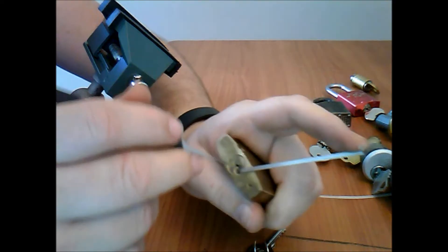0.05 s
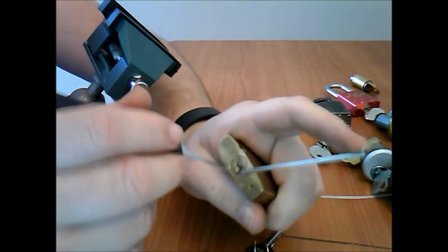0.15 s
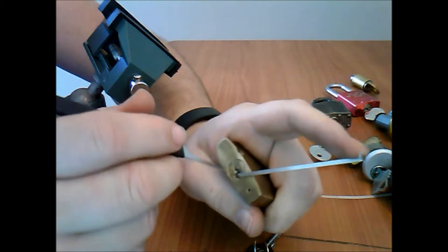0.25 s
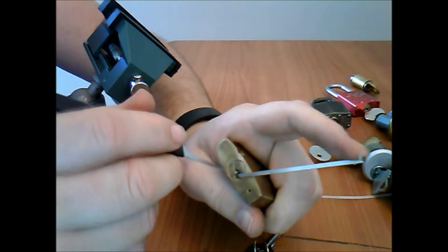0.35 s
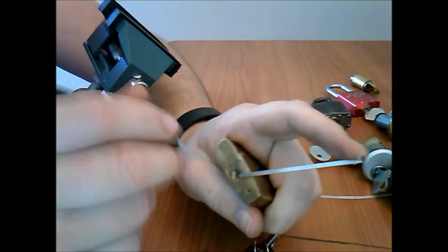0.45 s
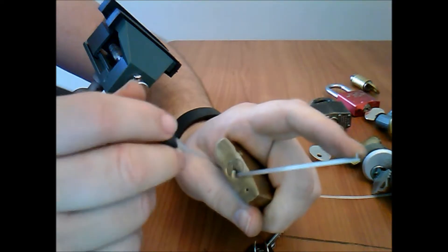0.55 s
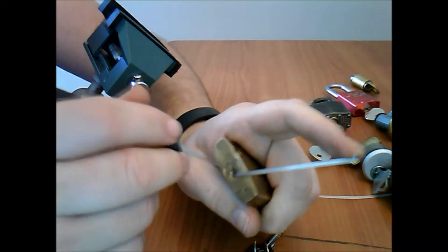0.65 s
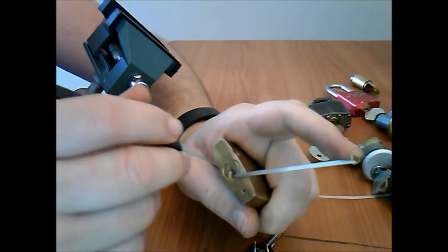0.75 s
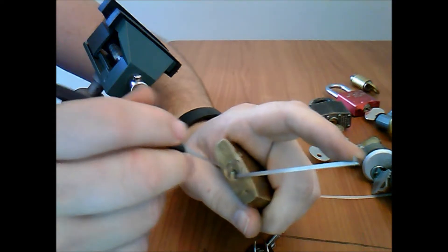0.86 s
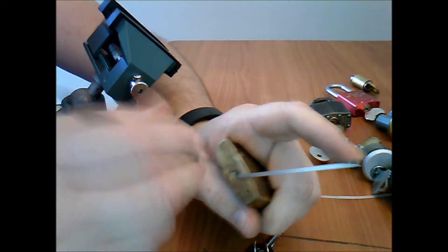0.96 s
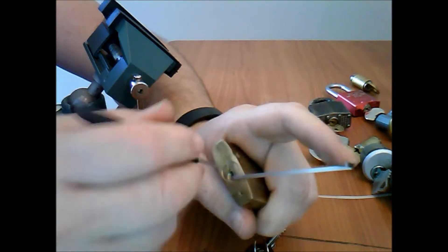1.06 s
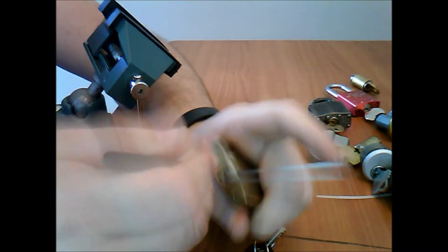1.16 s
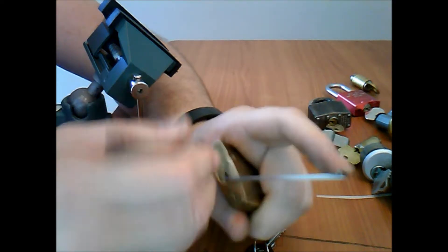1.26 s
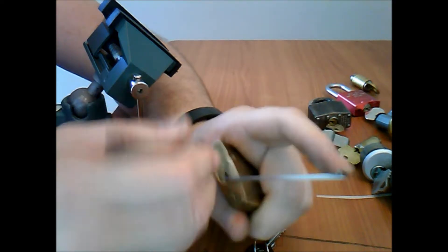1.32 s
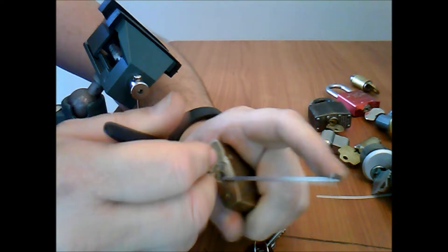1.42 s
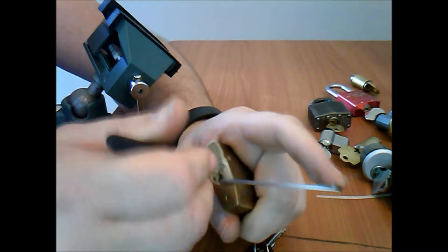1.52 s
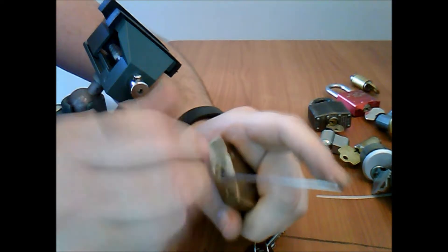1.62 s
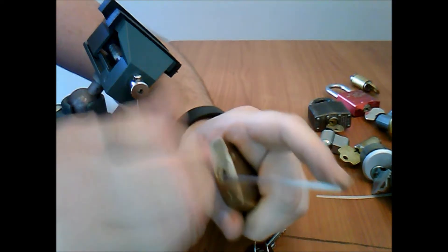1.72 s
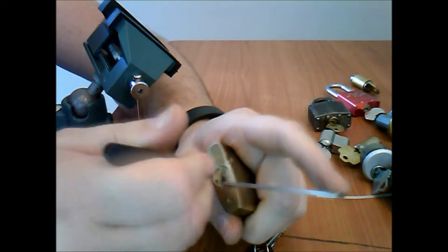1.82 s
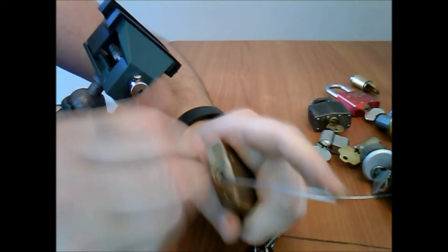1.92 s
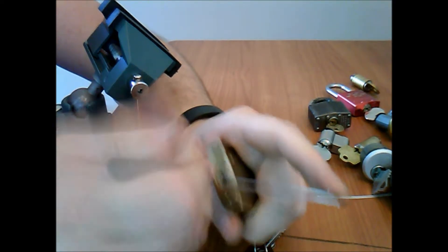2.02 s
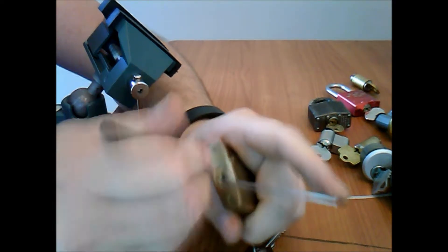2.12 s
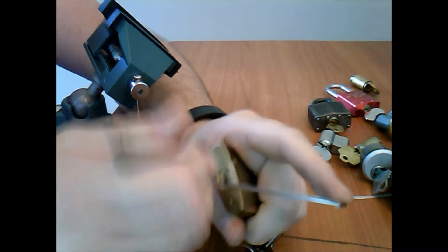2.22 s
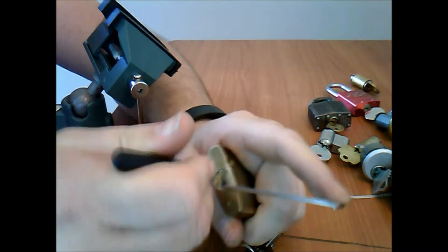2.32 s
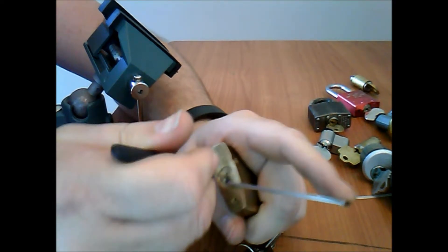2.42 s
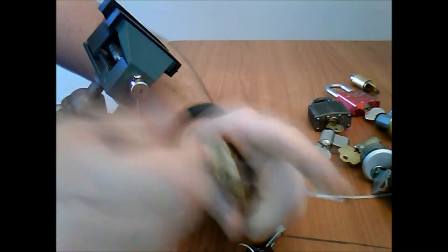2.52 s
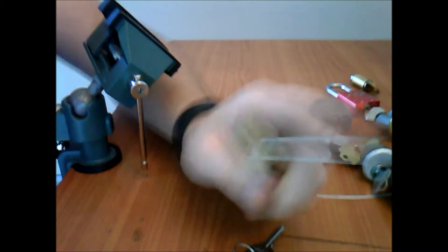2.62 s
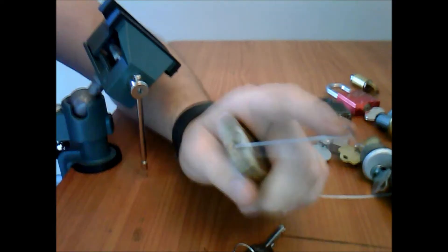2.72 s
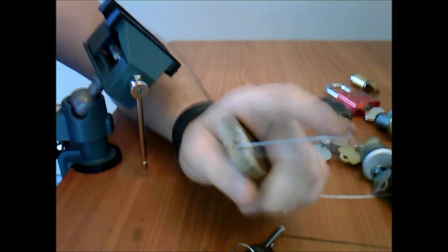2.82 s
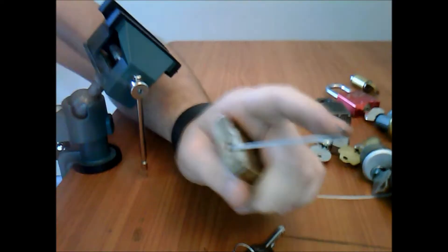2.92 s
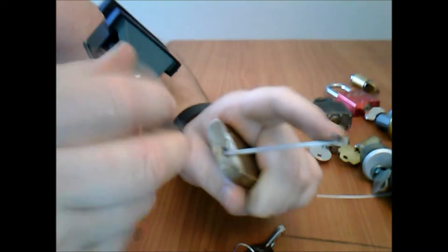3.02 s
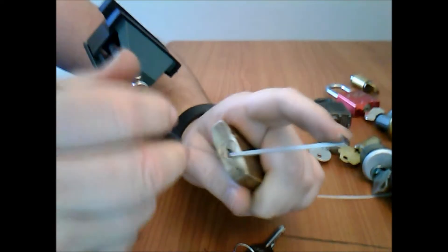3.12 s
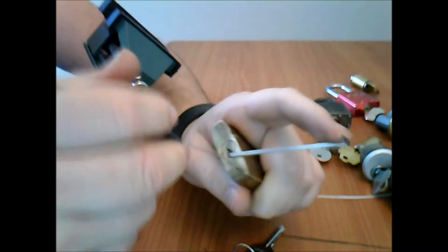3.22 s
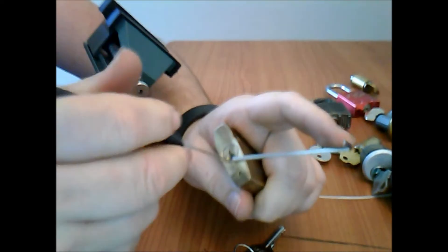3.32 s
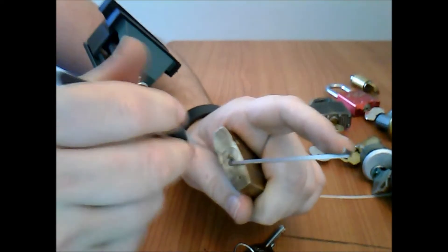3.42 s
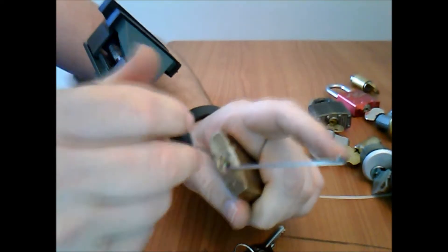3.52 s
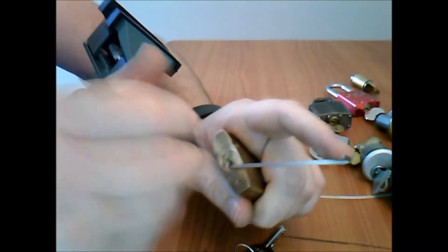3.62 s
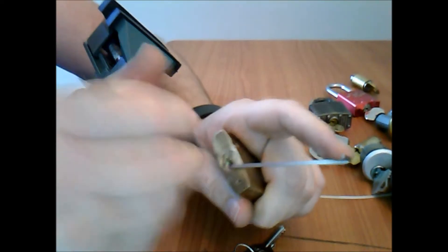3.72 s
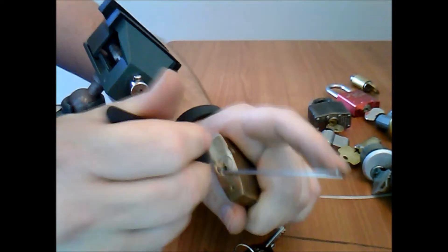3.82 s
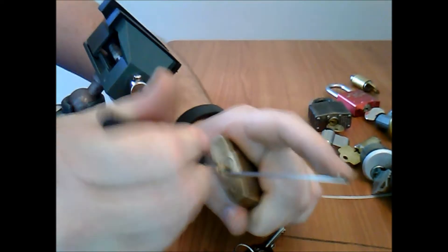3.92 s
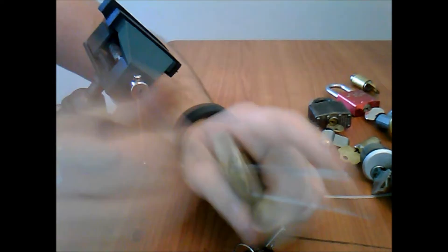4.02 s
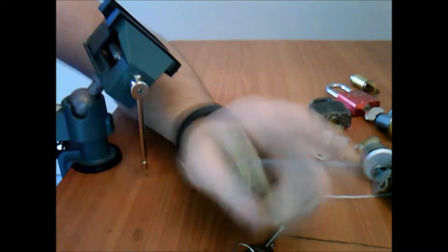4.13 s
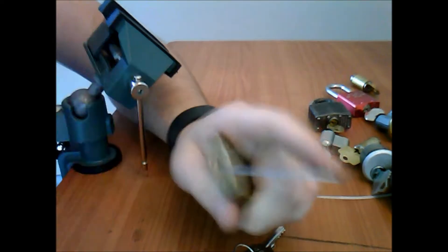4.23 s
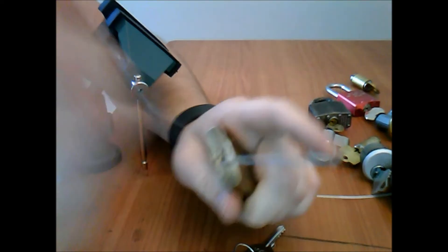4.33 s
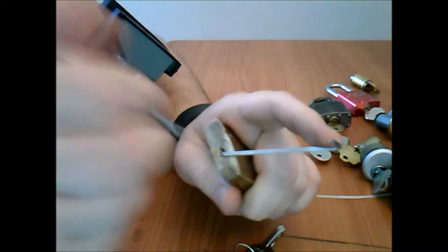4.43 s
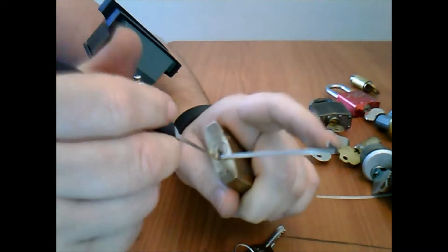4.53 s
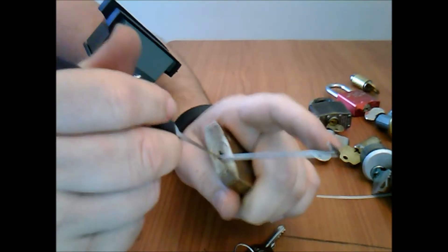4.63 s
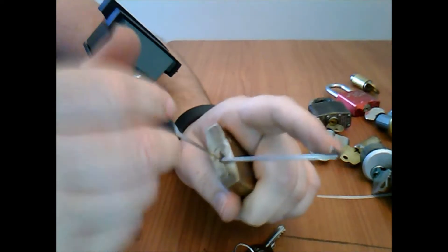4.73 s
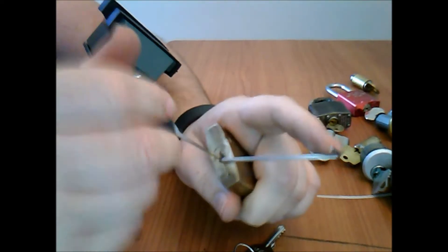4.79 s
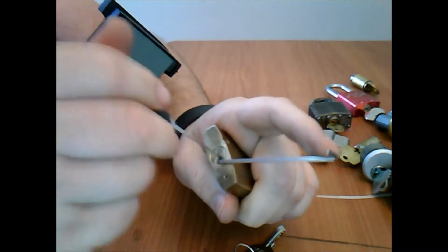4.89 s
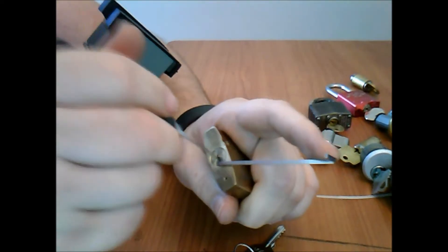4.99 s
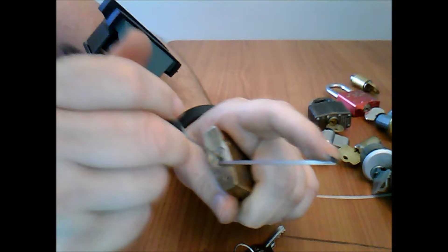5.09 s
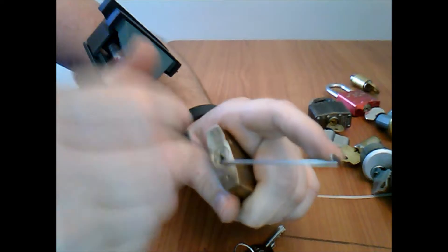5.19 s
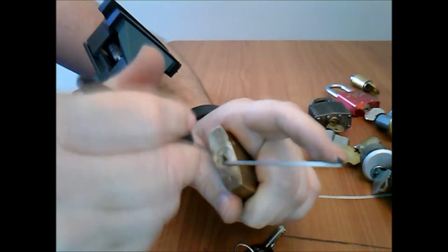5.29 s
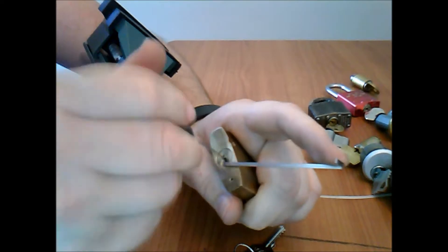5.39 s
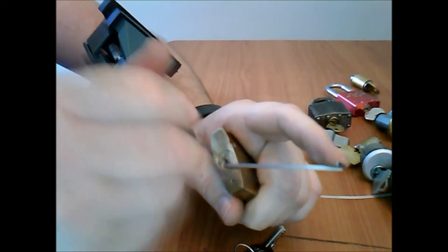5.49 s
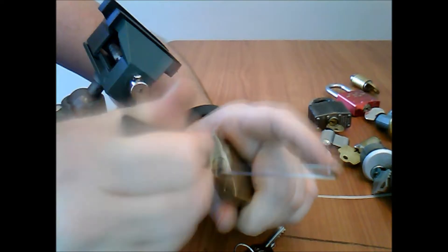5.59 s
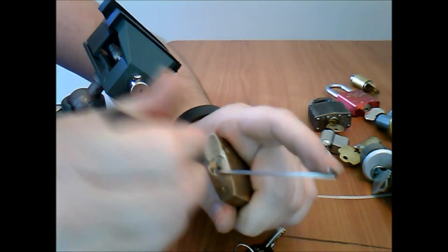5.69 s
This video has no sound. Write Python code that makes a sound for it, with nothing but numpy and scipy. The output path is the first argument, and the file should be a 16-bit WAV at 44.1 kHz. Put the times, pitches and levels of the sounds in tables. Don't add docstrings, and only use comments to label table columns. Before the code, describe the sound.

A steel pick clicks quietly in a brass padlock, then rips out twice with sharp metallic zips, amid desk thumps and faint electronic whine.

```python
import sys
import numpy as np
from scipy import signal
from scipy.io import wavfile
from scipy.ndimage import uniform_filter1d

SR = 44100
rng = np.random.default_rng(int(sys.argv[2]) if len(sys.argv) > 2 else 0)


def natural_amplitude(level_db):
    exponent = np.asarray(level_db, float) / 20
    return 10 ** exponent


def log_audio(samples):
    frames = np.atleast_2d(samples).T
    limited = np.clip(frames, -1, 1)
    pcm = np.round(limited * 32767).astype(np.int16)
    wavfile.write(sys.argv[1], SR, pcm)


N = 253575


def unit_rms(x):
    return x / np.sqrt(np.mean(x ** 2) + 1e-20)


def read_curve(points, hz):
    f, value = np.transpose(points)
    return np.interp(np.log(hz + 1), np.log(f + 1), value)


def add(mix, s, sound):
    part = mix[round(s * SR):][:len(sound)]
    part += sound[:len(part)]


def resonate(x, hz, width):
    return signal.lfilter(*signal.iirpeak(hz, hz / width, SR), x)


def resonate_twice(x, hz, width, second=1):
    return resonate(resonate(x, hz, width), hz, second * width)


def body(x, modes):
    return unit_rms(sum(natural_amplitude(db) * resonate_twice(x, hz, w, 1.4) for hz, w, db in modes))


def swells(rows, rest_db):
    t = np.arange(N) / SR
    fall_db = -15.5
    level = natural_amplitude(rest_db)
    for s, db, length in rows:
        level = level + natural_amplitude(db + fall_db * abs(t - s) / max(length, .01))
    return level


# frequency in Hz, density in dB per Hz.
HISS = [(15, -24), (25, 10.5), (50, -7), (180, -26), (354, -19.5), (516, -19.5), (714, -14), (1260, -16.5),
        (1520, -22.5), (2000, -21.5), (4250, -30), (4740, -29), (5730, -33.5), (8140, -29.5),
        (16000, -60.5)]
# frequency in Hz, width in Hz, level in dB.
FAN = [(122.84, 6.18, -69), (3356, 850, -81.5)]


def air():
    hiss_db, patch_db = -67.5, 1.8
    frames, hz = N // 256 + 5, np.fft.rfftfreq(1024, 1 / SR)
    a, b, patches = rng.standard_normal((frames, 513, 3)).T
    patches = unit_rms(uniform_filter1d(uniform_filter1d(patches, 14, 0), 14, 1))
    spectra = (a + 1j * b) * natural_amplitude(read_curve(HISS, hz)[:, None] + patch_db * patches)
    hiss = signal.istft(spectra, nperseg=1024, noverlap=768)[1][:N]
    hums = sum(natural_amplitude(db) * unit_rms(resonate_twice(rng.standard_normal(N), f, w)) for f, w, db in FAN)
    return natural_amplitude(hiss_db) * unit_rms(hiss) + hums


# time in seconds, level in dB.
DRONE = [(0.0, -72), (1.55, -72), (1.92, -67), (2.21, -67), (2.451, -72.5), (2.751, -70), (2.99, -65.5),
         (3.621, -77.5), (3.84, -76.5), (4.02, -62), (4.32, -65), (4.64, -73), (4.851, -70.5), (5.28, -61),
         (5.57, -74), (5.75, -71)]


def drone():
    fuzz = resonate_twice(rng.standard_normal(N), 588, 130)
    return natural_amplitude(np.interp(np.arange(N) / SR, *np.transpose(DRONE))) * unit_rms(fuzz)


# frequency in Hz, level in dB, fuzz from 0 to 1.
WHINE = [(4000, -11, .6), (6000, -3, .55), (8000, 3.5, .4), (10000, -.5, .35), (12000, -10, .55),
         (14000, -17, .3)]
# start in seconds, length in seconds, level in dB.
BURSTS = [(0.084, 0.041, -71.5), (0.164, 0.056, -74), (.46, 0.051, -72), (0.55, .064, -72.5),
          (0.774, .035, -74), (0.853, 0.051, -73), (1.253, 0.051, -72), (1.353, 0.052, -75),
          (1.446, 0.059, -72), (1.67, 0.029, -72), (1.749, .047, -71), (1.947, 0.052, -71.5),
          (2.05, 0.053, -74), (2.151, 0.053, -72), (2.257, 0.036, -72.5), (2.344, 0.037, -69),
          (2.454, 0.07, -79), (2.67, 0.03, -67), (2.746, 0.043, -70), (2.842, 0.049, -69),
          (2.943, 0.054, -73), (3.059, .035, -71), (3.146, 0.047, -69.5), (3.247, 0.047, -78.5),
          (3.338, .03, -75.5), (3.444, 0.05, -73.5), (3.653, .036, -73), (3.737, .036, -69),
          (3.83, 0.069, -75.5), (3.952, 0.052, -72.5), (4.054, 0.043, -70), (4.225, 0.06, -73),
          (4.339, 0.05, -77.5), (4.445, .043, -73), (4.538, 0.041, -77), (4.82, 0.087, -72.5),
          (4.937, 0.025, -83.5), (5.032, 0.05, -72.5), (5.13, 0.053, -72.5), (5.221, 0.054, -73.5),
          (5.325, .06, -70.5), (5.431, 0.05, -73), (5.546, 0.022, -74), (5.623, 0.051, -72),
          (5.721, 0.033, -69.5)]
# start in seconds, length in seconds, level in dB.
LONE = [
    (.263, 0.046, -73),
    (0.359, .05, -73),
    (.664, 0.059, -74),
    (.951, 0.056, -74),
    (1.052, 0.053, -71.5),
    (1.158, .014, -77),
    (1.51, 0.1, -72),
    (1.821, 0.1, -77),
    (3.543, 0.063, -72.5),
]


def whine():
    fizz_db, lone_rest_db = -3.5, -16
    out = np.zeros(N)
    hz, share_db, fuzz = np.transpose(WHINE)[:, :, None]
    weaker = share_db < share_db.max()
    rest_db = [0] * len(BURSTS) + [lone_rest_db] * len(LONE)
    lucks = rng.standard_normal((len(rest_db), len(WHINE), 4000))
    for (s, length, db), rest, luck in zip(BURSTS + LONE, rest_db, lucks):
        t = np.arange(min(round(length * SR), 3900)) / SR
        blur = unit_rms(uniform_filter1d(uniform_filter1d(luck, 100), 100))[:, :len(t)]
        mix_db = share_db + rest * weaker + 2 * luck[:, :1].clip(-2, 1)
        lines = natural_amplitude(mix_db) * (1 - fuzz + fuzz * blur) * np.sin(2 * np.pi * hz * t)
        fizz = resonate(resonate(luck[0, ::-1], 7000, 6000), 7500, 6000)[:len(t)]
        sound = lines.sum(0) + natural_amplitude(fizz_db) * fizz
        add(out, s, natural_amplitude(db) * signal.windows.tukey(len(t), .15) * sound)
    return out


# frequency in Hz, width in Hz, level in dB.
STAND = [(97.6, 5.5, 0)]
# peak time in seconds, peak level in dB, swell length in seconds.
NUDGES = [(.57, -77, 0.088), (1.09, -56.5, 0.087), (1.46, -51.5, 0.077), (1.68, -63, 0.02),
          (1.82, -54, 0.04), (1.92, -50, 0.059), (2.02, -52, 0.055), (2.34, -46, 0.035),
          (2.61, -40.5, 0.047), (2.7, -38.5, 0.11), (2.9, -36, 0.06), (2.96, -44.5, 0.23),
          (3.1, -48.5, 0.17), (3.3, -46, 0.1), (3.44, -43.5, 0.016), (3.55, -55.5, 0.042),
          (3.71, -51.5, 0.028), (3.79, -58, 0.12), (4.12, -50, 0.037), (4.2, -45.5, 0.11),
          (4.32, -43.5, 0.0099), (4.42, -51, 0.16), (5.66, -63.5, 0.041)]
# peak time in seconds, peak level in dB, swell length in seconds.
CREAKS = [(1.23, -69, 0.11), (1.68, -57, 0.014), (1.89, -63, 0.051), (2.19, -64, 0.12), (2.55, -71, 0.18),
          (2.7, -46, 0.11), (2.8, -74, 0.014), (2.86, -34.5, 0.02), (2.99, -52.5, 0.063), (3.22, -70, 0.05),
          (3.31, -61, 0.099), (3.79, -66, 0.036), (4.15, -54, 0.074), (4.42, -67, 0.21)]


def shake():
    still_db, board_db = -63.5, -67
    a, b, c = rng.standard_normal((3, N))
    wide = unit_rms(resonate(resonate(a, 23, 73), 29, 130))
    ringing = unit_rms(sum(natural_amplitude(db) * resonate(a, hz, w) for hz, w, db in STAND))
    deep = unit_rms(wide + 0.41 * ringing)
    lumps = natural_amplitude(1.53 * unit_rms(uniform_filter1d(uniform_filter1d(c, 500), 500)))
    woody = unit_rms(lumps * resonate(resonate(b, 300, 330), 410, 480))
    return swells(NUDGES, still_db) * deep + swells(CREAKS, board_db) * woody


# start in seconds, level in dB, frequency in Hz, T60 in seconds.
THUDS = [(2.31, -45, 56, 0.13), (2.603, -14, 81, 0.062), (2.621, -28.5, 46, 0.22),
         (2.728, -20.5, 60.5, 0.056), (2.8499, -15.5, 98, 0.047), (2.982, -32.5, 87.4, 0.38),
         (3.064, -36, 81.7, 0.59), (3.231, -34, 164, 0.067), (3.284, -37.5, 128, .15),
         (3.313, -39, 177, 0.16), (3.343, -36.5, 142, 0.087), (3.702, -44.5, 60.5, 0.054),
         (4.089, -29, 268, 0.033), (4.104, -29.5, 61.5, 0.11), (4.143, -35, 42, .2),
         (4.177, -30.5, 45.8, 0.21), (4.2, -30.5, 40, .12), (4.2216, -23.5, 100, 0.11),
         (4.242, -35, 70, .05), (4.273, -31, 90, .06), (4.306, -35, 90, 0.11), (2.664, -32, 60.4, 0.092),
         (2.772, -36, 90, 0.11), (2.815, -30, 91, .06), (2.837, -25.5, 75.3, 0.034),
         (3.168, -33.5, 90, .04), (2.858, -31.5, 103, .15), (2.716, -34, 69.6, .05),
         (5.673, -31.5, 70.1, 0.021)]


def thuds():
    rise_s = .0009
    out, t = np.zeros(N), np.arange(12000) / SR
    for s, db, hz, t60 in THUDS:
        swing = np.sin(2 * np.pi * hz * t) * (1 - np.exp(-t / rise_s))
        add(out, s, -natural_amplitude(db - 60 * t / t60) * swing)
    return out


def knocks(rows, rattle_db, spread, top_hz=2600):
    out, t = np.zeros(N), np.arange(6000) / SR
    for (s, db, hz, t60), grit in zip(rows, rng.standard_normal((len(rows), 6000))):
        rattle = unit_rms(resonate_twice(grit, hz, spread * hz, 2))
        sound = np.sin(2 * np.pi * hz * t) + natural_amplitude(rattle_db) * rattle
        sound *= natural_amplitude(-60 * t / t60) * (1 - np.exp(-t / 0.0018))
        add(out, s, natural_amplitude(db) * sound / abs(sound).max())
    return signal.sosfilt(signal.butter(2, top_hz, fs=SR, output="sos"), out)


# start in
# seconds, peak in dB, frequency in Hz, T60 in seconds.
KNOCKS = [(0.576, -52.5, 603, 0.16), (1.925, -40.5, 603, 0.012), (1.939, -38.5, 593, 0.11),
          (1.951, -47, 687, 0.12), (2.114, -44.5, 750, 0.062), (2.543, -22, 753, 0.05),
          (2.556, -19, 350, 0.012), (2.5955, -16.5, 380, 0.026), (2.604, -26.5, 235, 0.02),
          (2.615, -22, 730, 0.024), (2.807, -32, 802, 0.048), (2.796, -40, 364, 0.071),
          (2.834, -34, 612, 0.03), (2.841, -28, 437, 0.04), (2.858, -31.5, 396, 0.12),
          (2.882, -31, 400, 0.063), (2.916, -37, 398, 0.11), (2.987, -36.5, 372, 0.036),
          (3.283, -60.5, 553, 0.079), (3.29, -42, 327, 0.17), (3.319, -39.5, 358, 0.11),
          (3.783, -53, 550, 0.28), (4.102, -22.5, 390, 0.015), (4.117, -45, 500, 0.067),
          (4.103, -24, 568, 0.025), (2.544, -39, 273, 0.047), (3.12, -46, 301, 0.23),
          (4.232, -48, 321, 0.056), (4.211, -41, 503, 0.024), (4.276, -45.5, 393, 0.096),
          (4.887, -51, 610, 0.1), (5.081, -53, 517, 0.084), (5.429, -55.5, 552, 0.15)]
# start in seconds, peak in dB, frequency in Hz, T60 in seconds.
RAPS = [(1.94, -37.5, 1164, 0.032), (2.1135, -41, 1376, 0.026), (2.123, -41.5, 1230, 0.092),
        (2.468, -52, 1270, 0.29), (2.596, -18, 1010, 0.022), (2.782, -42, 1026, 0.13),
        (2.836, -41, 1070, 0.033), (2.858, -54.5, 1295, .05), (2.993, -39, 1123, 0.037),
        (3.072, -44, 1127, 0.13), (3.216, -45, 1230, 0.059), (3.465, -56.5, 1200, 0.13),
        (4.088, -24.5, 1200, 0.036), (4.211, -61.5, 1910, 0.03), (4.278, -49.5, 1830, 0.12)]


def desk_bumps():
    return knocks(KNOCKS, rattle_db=-5, spread=.55) + knocks(RAPS, rattle_db=1.5, spread=0.59)


# peak time in seconds, peak level in dB, swell length in seconds.
SLIDES = [
    (.6, -74, 0.089),
    (1.06, -74, 0.082),
    (1.66, -78, 0.082),
    (1.82, -81, 0.26),
    (2.04, -73, 0.33),
    (4.72, -78, .15),
    (5.44, -77, 0.14),
    (5.5, -80, 0.091),
]


def slides():
    friction = resonate(resonate(rng.standard_normal(N), 3500, 900), 3500, 1300)
    return swells(SLIDES, -100) * unit_rms(friction)


def touches(rows, kind, breadth, modes, wide_db, rise_ms, clean=0):
    harden = 0.22
    out, t = np.zeros(N), np.arange(2500) / SR
    usual_hz, usual_ms, usual_db = kind
    noises = rng.standard_normal((len(rows), 2, 2500))
    for (s, db, low_hz, top_db, *own_hz), (grit, hop) in zip(rows, noises):
        ms = usual_ms * natural_amplitude(harden * (usual_db - db))
        top_hz = own_hz[0] if own_hz else usual_hz
        bounce = natural_amplitude(1.8 * unit_rms(uniform_filter1d(hop, 30)))
        hit = np.exp(-t * 1000 / max(ms, .1))
        trail = natural_amplitude(-12.5) * bounce * np.exp(-t * 200 / max(ms, .1))
        push = grit * (hit + trail) * (1 - np.exp(-t * 1000 / rise_ms))
        push[1] += clean * np.linalg.norm(push)
        low = unit_rms(resonate_twice(push, low_hz, breadth * low_hz, 1.5))
        top = unit_rms(resonate_twice(push, top_hz, breadth * top_hz, 1.5))
        sound = low + natural_amplitude(top_db) * top + natural_amplitude(wide_db) * (1 + natural_amplitude(top_db)) * body(push, modes)
        add(out, s, natural_amplitude(db) * sound / abs(sound).max())
    return out


# frequency in Hz, width in Hz, level in dB.
BAR = [(4100, 2000, -21), (6200, 1600, 7.5), (9170, 2300, 2.5)]
# upper part in Hz, contact in ms at usual strength, usual peak in dB.
TAP = (3930, 0.94, -48)
SOFT_TAP = (3920, 2.0, -52.5)
# start in seconds, peak in dB, lower part in Hz, upper share in dB.
TICKS = [
    (3.3611, -41, 2440, -12),
    (3.376, -38.5, 2200, 8.5),
    (3.4145, -46.5, 2310, 21),
    (3.525, -48.5, 1980, 28.5),
    (4.5648, -38, 2044, 4),
    (4.8497, -40.5, 1950, 14.5),
    (4.9648, -42, 2420, 13),
]
# start in seconds, peak in dB, lower part in Hz, upper share in dB.
RINGS = [
    (0.5671, -61, 2400, 2),
    (3.884, -57, 2430, 14),
    (4.6664, -49.5, 2330, -2),
    (4.6703, -42, 2500, 14),
    (4.8186, -49, 2240, 26),
    (4.8442, -42, 2110, 14),
]


def bar_ticks():
    firm = touches(TICKS, TAP, 0.11, BAR, -8.0, 0.85)
    return firm + touches(RINGS, SOFT_TAP, 0.088, BAR, -22.5, 0.96)


# frequency in Hz, width in Hz, level in dB.
LOCK = [(2200, 2100, 8), (4000, 730, 11), (5280, 1910, 7.5), (8040, 4000, 1.5), (11500, 14000, 5)]
# start in seconds, length in seconds, peak in dB.
RASP = [(0.974, 0.082, -69), (1.17, 0.049, -57), (2.538, 0.031, -34.5), (2.546, 0.022, -35),
        (2.592, 0.027, -40.5), (3.067, 0.1, -68), (3.204, 0.065, -83), (3.743, 0.05, -77),
        (4.085, 0.017, -26.5), (4.087, 0.024, -40), (4.107, 0.093, -50), (1.193, .015, -54),
        (0.059, .04, -70), (4.942, 0.08, -64.5), (5.539, 0.037, -56.5)]


def rasp():
    level, t = np.zeros(N), np.arange(N) / SR
    for s, length, db in RASP:
        stroke_db = [db - 9.5, db, db - 16]
        level += natural_amplitude(np.interp((t - s) / length, [0, 0.34, 1], stroke_db, left=-200, right=-200))
    strength = natural_amplitude(4.5 * rng.exponential(1, N).clip(0, 3))
    slips = strength * (rng.random(N) < 4000 / SR) * rng.standard_normal(N)
    return level * body(slips, LOCK)


# upper part in Hz, contact in ms at usual strength, usual peak in dB.
SHAFT = (6360, 11.3, -40)
# start in seconds, peak in dB, lower part in Hz, upper share in dB.
SCUFFS = [(0.168, -58.5, 1610, -6), (0.567, -55.5, 5050, 6), (1.2054, -63, 3350, -8),
          (1.5866, -51.5, 2880, 0), (2.4686, -52, 3700, 2), (2.7821, -48, 4200, -7),
          (3.0756, -41.5, 2900, -25), (3.0944, -48, 1770, 0), (3.1333, -54, 1710, 6),
          (3.2116, -40, 2920, -17), (3.7457, -46, 2200, 24), (4.0595, -52.5, 2360, -2),
          (4.5645, -44.5, 2150, -6.5), (4.9417, -49.5, 1740, 1), (5.5253, -56, 2060, 0),
          (5.5426, -51, 2280, -10)]


def scuffs():
    return touches(SCUFFS, SHAFT, 0.48, LOCK, -11.5, 0.12)


# upper part in Hz, contact in ms at usual strength, usual peak in dB.
NICK = (6000, 1.3, -54.5)
# start in seconds, peak in dB, lower part in Hz, upper share in dB, upper part in Hz.
BLUNT = [
    (0.0555, -34.5, 2760, 1.5, 3500),
    (1.9385, -35.5, 1220, -4, 2150),
    (2.1135, -39, 1060, 0, 1770),
    (2.5965, -32.5, 1800, -1, 3600),
    (4.572, -40, 2000, -4, 3600),
    (3.2255, -44, 990, -4, 2250),
    (1.879, -47, 2200, -9, 4800),
]


def blunt_taps():
    return touches(BLUNT, NICK, 0.24, LOCK, -26, 0.2, clean=1.4)


# start in seconds, peak in dB, lower part in Hz, upper share in dB, upper part in Hz.
NICKS = [(0.289, -59, 4670, -2, 4860), (0.171, -57, 7900, -13, 6000), (1.1915, -49, 8500, -8, 5000),
         (5.544, -55, 7350, 0, 4500), (1.597, -49, 5500, -5, 6960), (1.585, -45, 4700, 5, 8500),
         (1.8995, -45.5, 5650, 8, 8000), (2.4693, -53, 7860, 4, 6000), (0.9961, -49.5, 2550, 5, 4830),
         (1.002, -47, 8000, -1, 5160), (1.0225, -48, 4240, 3, 5050), (1.0395, -53, 3100, -3, 4600),
         (1.1945, -41, 2300, 8, 5100), (1.2025, -51, 2000, 5, 5270), (1.721, -56, 4530, 12, 6250),
         (2.8815, -51, 2200, 2, 7860), (3.0944, -39, 2840, -0.5, 7670), (3.215, -44, 3000, 15, 7260),
         (3.231, -66, 3030, 8.5, 7600), (3.246, -48, 4000, 5, 7600), (3.3645, -37, 2480, 3, 4000),
         (3.3705, -38.5, 4000, -3, 6840), (3.408, -44, 4100, 7, 8500), (3.455, -51, 4000, 9, 6000),
         (3.558, -55, 7000, -2, 10530), (4.822, -51, 4000, 0.5, 6400), (4.853, -42, 4000, 9.5, 6280),
         (5.5253, -49, 4640, 1.5, 9050), (5.549, -47, 2380, 4, 7450), (5.571, -49, 2500, 6, 9200)]


def nicks():
    return touches(NICKS, NICK, 0.11, LOCK, -7, 0.2)


# upper part in Hz, contact in ms at usual strength, usual peak in dB.
WARD = (5900, 1, -59)
# start in seconds, peak in dB, lower part in Hz, upper share in dB.
FLICKS = [(1.0185, -50, 4400, 5), (1.2188, -36.5, 3120, -9), (1.703, -29, 3520, 0.5),
          (2.1602, -44.5, 1790, -3), (3.2344, -57, 1970, 2), (3.2598, -43.5, 1930, -1),
          (4.2579, -44.5, 2130, -4), (5.5605, -38.5, 5540, 3), (3.014, -59, 4500, 0),
          (4.2985, -51.5, 5000, -2.5), (4.583, -51.5, 5000, 6.5)]


def flicks():
    return touches(FLICKS, WARD, 0.88, LOCK, -48, 0.15, clean=0.5)


# upper part in Hz, contact in ms at usual strength, usual peak in dB.
TIP = (5120, 1.4, -49.5)
# start in seconds, peak in dB, lower part in Hz, upper share in dB.
CLICKS = [(1.005, -60, 3850, 0), (1.0274, -56, 3020, -23), (1.0444, -50, 3990, -19),
          (1.1723, -39, 2420, -5), (1.1848, -49, 3240, -10), (1.1965, -44.5, 2180, -5),
          (5.369, -53, 5800, 0), (1.926, -33, 2760, -0.5), (1.9966, -47, 2200, -2),
          (2.0056, -42, 1710, 1.5), (2.3473, -48, 1840, -4), (2.858, -54, 3300, -15),
          (3.0643, -47.5, 2980, -14.5), (3.3034, -53.5, 4360, -3), (3.6035, -58, 1820, 4.5),
          (3.8068, -54.5, 1710, 7), (3.9608, -38.5, 2270, 2.5), (5.361, -48.5, 4000, 3.5),
          (5.3803, -63, 1820, -25), (5.7345, -50, 2420, 5)]


def clicks():
    return touches(CLICKS, TIP, 0.46, LOCK, -20, 0.16)


# start in seconds, peak in dB, frequency in Hz, T60 in seconds.
SHIVERS = [
    (2.558, -37.5, 7800, 0.23),
    (4.135, -42, 6400, .15),
    (2.625, -61, 3800, 0.35),
    (2.56, -34, 2300, 0.18),
]


def shivers():
    return knocks(SHIVERS, rattle_db=12, spread=0.09, top_hz=15000)


# upper part in Hz, contact in ms at usual strength, usual peak in dB.
SNAP = (7370, 0.86, -8)
# start in seconds, peak in dB, lower part in Hz, upper share in dB, upper part in Hz.
PINS = [(2.3872, -22.5, 2380, 5, 6700), (2.3882, -25, 4000, 5, 8900), (2.5382, -16.5, 2960, 8, 7500),
        (2.5436, -9.5, 2680, 14, 8100), (2.5462, -15, 2930, 6, 7050), (2.5505, -18, 2020, 7, 7060),
        (2.5533, -7, 3370, 0, 6960), (2.5566, -4, 2030, 7.5, 7450), (2.5572, -11.5, 3030, -4, 4800),
        (2.612, -18.5, 2400, -3, 4360), (2.616, -20.5, 2870, -8, 5100), (2.6172, -21.5, 4000, 1, 7550),
        (2.6208, -22.5, 2430, -7, 4170), (2.6122, -40, 7600, 0, 10000), (2.6215, -35, 7800, 0, 10500),
        (4.0859, -12, 3000, -1.5, 7430), (4.0893, -14.5, 2420, -11, 7600), (4.0908, -9, 3400, 6, 7900),
        (4.0922, -14, 2780, 8, 6800), (4.1001, -10.5, 2900, 8, 6400), (4.1036, -9, 1930, -1.5, 7350),
        (4.1046, -10, 1833, -0.5, 4670)]


def pin_snaps():
    return touches(PINS, SNAP, 0.24, LOCK, -6.5, 0.053, clean=1.7)


# frequency in Hz, T60 in seconds.
ROOM = [(300, 0.13), (1500, 0.19), (3000, 0.24), (5000, 0.27), (8000, 0.19), (14000, 0.27)]


def room(x):
    swap_s = .011
    taps, at = np.zeros((3, SR // 2)), np.arange(120, SR // 2 - 10, 10)
    places = at + rng.integers(0, 10, (3, len(at)))
    np.put_along_axis(taps, places, rng.choice([-1., 1.], (3, len(at))), 1)
    hz, t, z = signal.stft(taps, SR, nperseg=256)
    tails = signal.istft(z * natural_amplitude(-60 * t / read_curve(ROOM, hz)[:, None]), SR, nperseg=256)[1]
    turn = np.arange(3)[:, None] / 3
    shares = np.sqrt(2 / 3) * np.cos(np.pi * (np.arange(N) / SR / swap_s + turn))
    return signal.oaconvolve(x * shares, tails / np.linalg.norm(tails[0]), axes=1)[:, :N].sum(0)


def scene():
    room_db, tick_room_db, bump_room_db = -7.5, -8, 3.0
    mic_hz = 10000
    bumps, ticks = desk_bumps(), bar_ticks()
    lock = rasp() + scuffs() + blunt_taps() + nicks() + flicks() + clicks() + shivers() + pin_snaps()
    echoes = room(lock + natural_amplitude(tick_room_db) * ticks + natural_amplitude(bump_room_db) * bumps)
    heard = lock + ticks + bumps + natural_amplitude(room_db) * echoes
    heard = signal.sosfilt(signal.butter(3, mic_hz, fs=SR, output="sos"), heard)
    return (air() + drone() + whine() + shake() + thuds() + slides() + heard)[None]


def roll_off(x):
    return signal.sosfilt(signal.butter(12, 16460, fs=SR, output="sos"), x)


def record(dry):
    edge_hz = 16250
    low_pass = signal.firwin(511, edge_hz, window=("kaiser", 9), fs=SR)
    mix = signal.oaconvolve(dry, low_pass[None], "same")
    return roll_off(mix)


dry = scene()
out = record(dry)
log_audio(out)
```